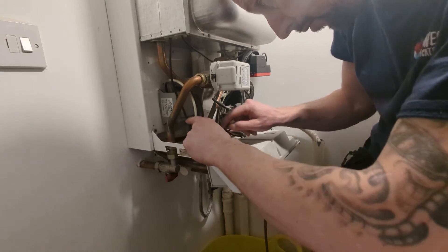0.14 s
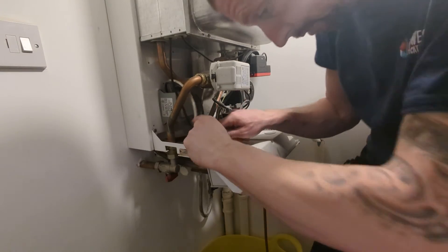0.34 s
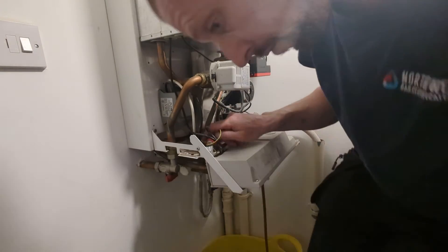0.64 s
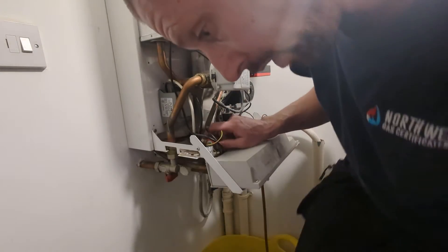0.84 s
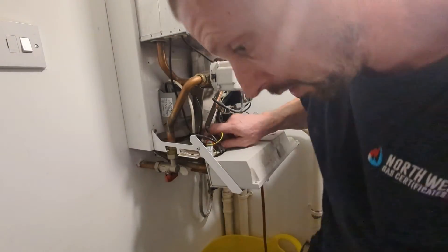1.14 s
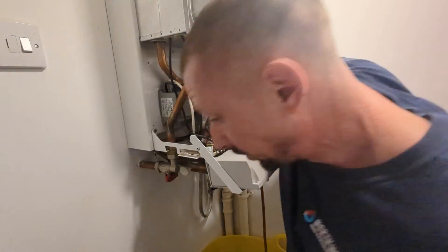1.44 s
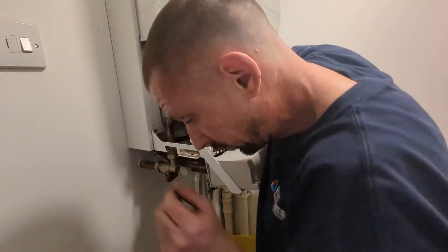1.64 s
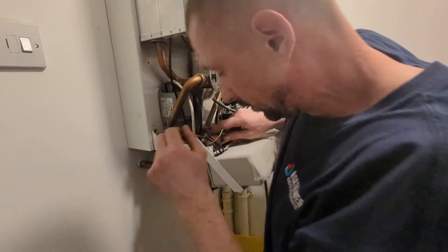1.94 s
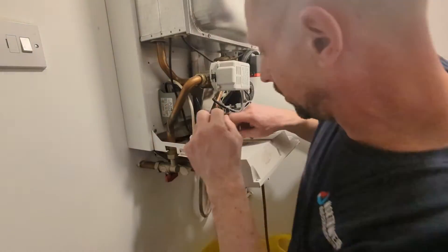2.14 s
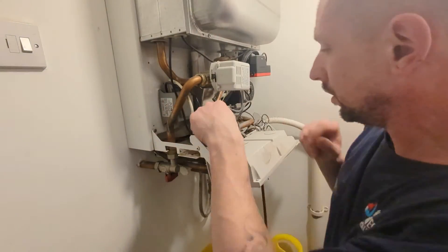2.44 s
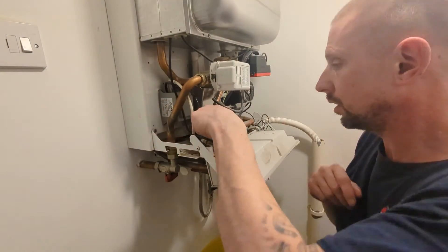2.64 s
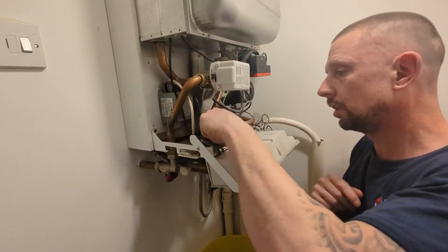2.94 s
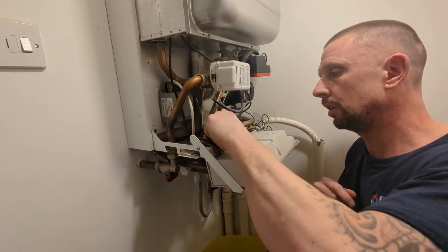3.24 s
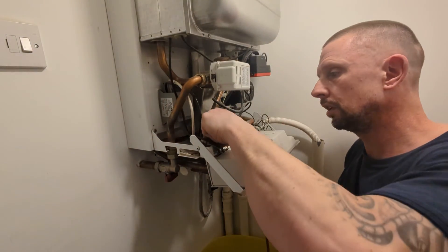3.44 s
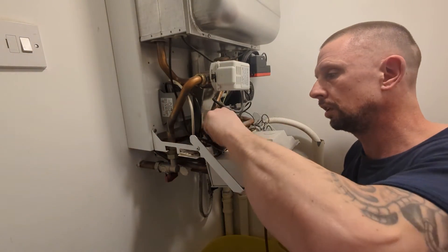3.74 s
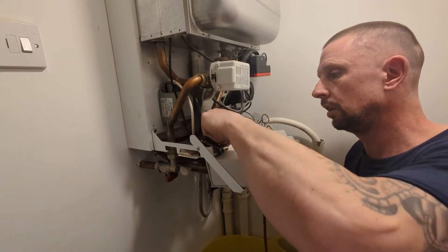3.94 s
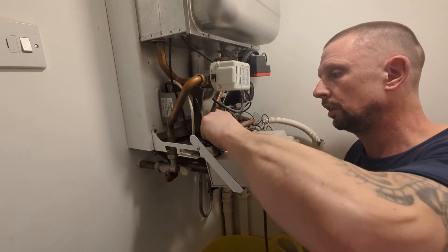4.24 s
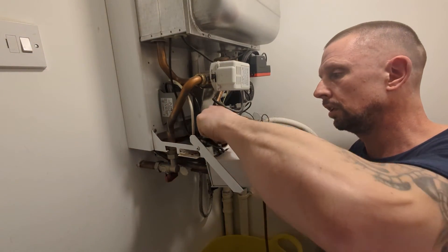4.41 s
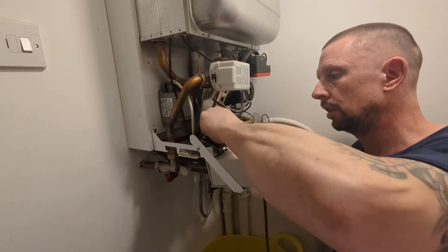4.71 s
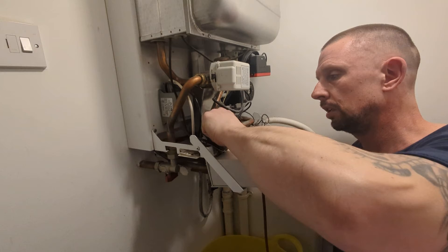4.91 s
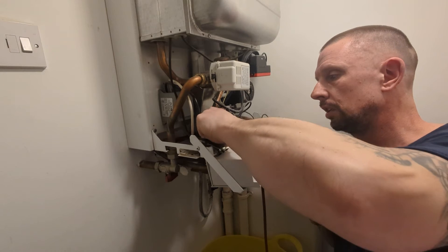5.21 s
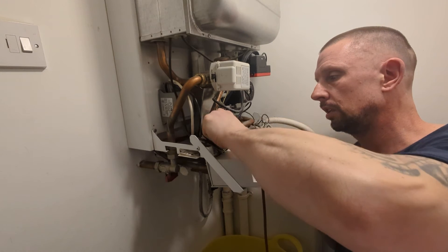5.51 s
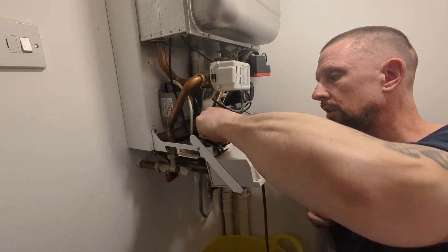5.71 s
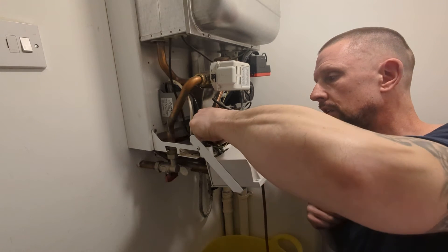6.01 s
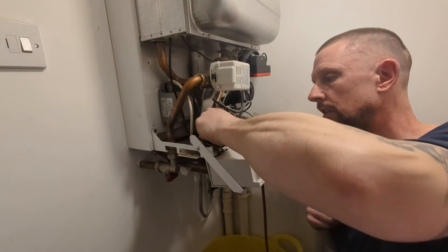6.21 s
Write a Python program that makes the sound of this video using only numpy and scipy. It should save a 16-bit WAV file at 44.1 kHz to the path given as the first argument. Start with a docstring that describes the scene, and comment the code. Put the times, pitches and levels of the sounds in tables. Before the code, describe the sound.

Fingers and a tool click and scrape on brass fittings in a metal casing, cloth rustles close by, hollow knocks and a clatter, then quiet fiddling.

```python
"""Hands work on a valve inside an open wall boiler: fingers and a tool click and scrape on brass fittings.
Each touch is shaped noise in six registers; casing, control box and small parts ring as decaying sines.
As the worker leans in, a shirt rustles and zips over an edge, made of rippled noise and thin whistles.
The casing takes hollow knocks and a clatter, and late on a small metal part gives one bright ping.
Soft bumping, a low rumble and the still air of a small hard-walled room are steady colours of noise."""
import sys
import numpy as np
from scipy import signal
from scipy.fft import rfft, irfft, next_fast_len
from scipy.io import wavfile

SR = 44100
rng = np.random.default_rng(int(sys.argv[2]) if len(sys.argv) > 2 else 0)


def pcm_store(signal):
    """Save signal as 16-bit PCM."""
    levels = np.round(np.clip(np.atleast_2d(signal), -1, 1) * 32767)
    wavfile.write(sys.argv[1], SR, levels.astype(np.int16).T)


N = 280476   # length in samples
TIME = np.arange(N) / SR   # seconds
LOW_CUT_HZ, TOP_CUT_HZ = 28.6, 15850

# the six registers of a touch, thud to tick; rise and ring times are later scaled by the manner of the touch:
# [low_hz, high_hz, rise_s, ring_s (fall by 60 dB), relative_db, weight_share, hardness_share, clank_share]
TOUCH_REGISTERS = [(151, 390, 0.0035, 0.34, -0.5, 1, 0.066, 0.083),
                   (413, 740, 0.0097, 0.21, -1, 0.59, 0.012, 0.054),
                   (850, 1460, 0.0021, .19, -2, 0.094, 0.036, 0.89),
                   (1440, 3000, 0.0035, 0.14, -5, 0, 0.013, 0.017),
                   (2726, 6050, 0.0016, 0.15, -3, 0.028, 0.61, 0),
                   (7100, 16000, 0.004, 0.11, -1.5, 0.23, 1, 0.06)]
# how fast the shirt slides as the worker leans in and back: [time_s, speed_db (0 is a steady slide)]
SHIRT_SPEED = [(0.0, -27), (0.4, -8), (0.55, -12), (0.74, -13), (0.8, -6), (0.92, -4.5), (1.22, -2),
               (1.5, 1.5), (1.72, 0), (2.0, -0.5), (2.16, 0.5), (2.44, -2), (2.77, 6), (2.86, 0.5),
               (2.95, -16), (3.12, -19), (3.5, -28)]


def from_db(db):
    """Decibels to gain."""
    return 10 ** (np.asarray(db) / 20)


def rms_one(x):
    """Scale to unit rms."""
    return x / np.sqrt(np.mean(x ** 2) + 1e-20)


def in_time(rows):
    """Each column of a curve, joined by straight lines, at every sample."""
    s, *columns = np.transpose(rows)
    return [np.interp(TIME, s, column) for column in columns]


def at_hz(points, hz):
    """Read a table of (Hz, value) on a log-frequency axis."""
    table_hz, values = np.array(points).T
    return np.interp(np.log(hz + 1), np.log(table_hz), values)


def drift(per_s):
    """Random wandering: values of spread 1, so many a second, joined by straight lines."""
    knots = rng.standard_normal(4096)
    return np.interp(TIME * per_s, np.arange(len(knots)), knots)


def ripple(depth_db, density):
    """Random peaks and gaps across frequency, as a function of Hz: the many modes of one spot."""
    knots = rng.standard_normal(1024)

    def gain_at(hz):
        place = density * np.log1p(hz / 400)
        return from_db(depth_db * np.interp(place, np.arange(len(knots)), knots))
    return gain_at


def diffuse(gain_at, size):
    """Stereo noise of a given colour and rms 1; the two sides are alike mainly in the bass."""
    # left-right likeness of the noise: [pitch_hz, correlation (1 is identical)]
    likeness = [(60, .99), (150, 0.95), (280, 0.79), (560, 0.57), (1100, 0.12), (2200, -0.028),
                (4500, 0.075), (15000, -0.052)]
    hz = np.fft.rfftfreq(size, 1 / SR)
    alike = np.clip(at_hz(likeness, hz), -1, 1)
    mid, side = rfft(rng.standard_normal((2, size)))
    both_sides = np.sqrt(1 + alike) * mid + np.sqrt(1 - alike) * side * [[1], [-1]]
    return rms_one(irfft(gain_at(hz) * both_sides, size))


def noise(spectrum, ripple_db=0):
    """Lasting diffuse noise with a tabled spectrum, rippled by nearby reflections."""
    peaks = ripple(ripple_db, density=35)

    def gain_at(hz):
        return from_db(at_hz(spectrum, hz)) * peaks(hz) * (hz > 15)
    return diffuse(gain_at, next_fast_len(N, True))[:, :N]


def panned(x, pan_db):
    """Lean a sound to the left by so many dB."""
    return x * from_db([[pan_db / 2], [-pan_db / 2]])


def add(track, s, sound):
    """Mix a sound in at a time in seconds."""
    at = int(round(s * SR))
    track[..., at:at + sound.shape[-1]] += sound[..., :N - at]


def high_passed(x, hz, order):
    """Butterworth high-pass."""
    return signal.sosfilt(signal.butter(order, hz, "high", fs=SR, output="sos"), x)


def low_passed(x, hz, order):
    """Butterworth low-pass."""
    return signal.sosfilt(signal.butter(order, hz, fs=SR, output="sos"), x)


def clicks(rows):
    """One impulse for each (s, dB)."""
    out = np.zeros(N)
    for s, db in rows:
        add(out, s, from_db([db]))
    return out


def blows(rows):
    """Force of a series of blows; a soft contact spreads it in time and leaves mostly the low modes."""
    force = np.zeros(N)
    for s, db, cut_hz in rows:
        push = low_passed(signal.unit_impulse(1024), cut_hz, order=2)
        add(force, s, from_db(db) * push)
    return force


def ring(force, modes):
    """Decaying sines set off by a force: each mode is a two-pole resonator."""
    out = 0
    for hz, db, t60 in modes:
        radius = from_db(-60 / (t60 * SR))
        angle = 2 * np.pi * hz / SR
        poles = [1, -2 * radius * np.cos(angle), radius * radius]
        out = out + from_db(db) * signal.lfilter([0, np.sin(angle)], poles, force + 1e-18)
    return out


def room(x, wet_db, t60):
    """Direct sound plus the dense reflections of close walls, which start after 2 ms."""
    t = TIME[:16384]
    tail = diffuse(np.ones_like, size=len(t)) * from_db(-60 * t / t60) * (t > .002)
    tail = rms_one(tail) / np.sqrt(len(t))
    return x + from_db(wet_db) * signal.fftconvolve(np.atleast_2d(x), tail, axes=1)[:, :N]


def air():
    """The still air of the room: steady, faint noise."""
    # its colour: [pitch_hz, relative_db per Hz]
    air_colour = [(88, -25.5), (150, -1.5), (361, -26), (566, -13.5), (662, -17), (888, -17), (1420, -23.5),
                  (1690, -20), (4240, -32.5), (6510, -33), (7320, -41), (11700, -40.5), (16000, -72.5)]
    return from_db(-66) * noise(air_colour)


def shifting(rumble_db, rumble_follows, bump_db, uneven_db):
    """Shifting weight bumps softly on the casing and stirs the room's lowest modes, more so at each heave."""
    # how much the body moves against floor and casing, as the level of its soft bumping: [time_s, effort_db]
    effort_curve = [(0.0, -62.5), (0.39, -54), (0.85, -61), (1.03, -48), (1.47, -45.5), (2.48, -54),
                    (2.78, -52.5), (2.96, -54), (3.4, -59.5), (3.52, -62), (3.77, -76), (3.91, -62.5),
                    (4.41, -60), (4.76, -68), (4.99, -65), (5.23, -60), (6.15, -69.5), (6.36, -65)]
    # heavier shifts of weight, each a short swell of rumble: [peak_s, level_db]
    heave_times = [(.5, -44), (1.151, -36.5), (1.93, -47), (2.12, -32.5), (2.91, -40.5), (3.82, -47),
                   (4.46, -51)]
    # colour of the rumble: [pitch_hz, relative_db per Hz]
    rumble_colour = [(20, -34), (30, -9), (40, -15), (50, 8.5), (59, 6.5), (70, 6.5), (85, -16),
                     (105, -14.5), (130, -5.5), (180, -49.5)]
    # colour of the bumping: [pitch_hz, relative_db per Hz]
    bumping_colour = [(59, -40.5), (100, 1.5), (161, 5), (189, 3), (284, -19), (324, -14), (413, -14),
                      (480, -5), (620, -34), (1060, -120)]
    heave_half_length_s = 0.045

    effort_db, = in_time(effort_curve)
    heaves = sum(from_db(db) * np.exp(-((TIME - s) / heave_half_length_s) ** 2) for s, db in heave_times)
    rumble = from_db(rumble_db + rumble_follows * (effort_db - effort_db.mean())) + heaves
    bumping = from_db(effort_db + bump_db + uneven_db * drift(13))
    return panned(rumble * noise(rumble_colour) + bumping * noise(bumping_colour), pan_db=-1.0)


def zips():
    """The sleeve's threads cross an edge almost evenly: a narrow, unsteady whistle that sinks as it slows."""
    # zips of the weave: [start_s, length_s, relative_db, starting_pitch_hz]
    zip_rows = [(0.595, 0.084, -69, 8800), (0.758, 0.082, -56, 9540), (0.82, 0.08, -60, 9380)]
    sag_hz_per_s, unevenness_per_s = 5650, 280
    out = np.zeros((2, N))
    for s, length, db, hz in zip_rows:
        t = TIME[:int(length * SR)]
        phase = 2 * np.pi * (hz * t - sag_hz_per_s * t ** 2 / 2)
        uneven = np.array([drift(unevenness_per_s)[:len(t)] for side in range(2)])
        swell = np.sin(np.pi * t / length)
        add(out, s, from_db(db) * swell * uneven * np.sin(phase))
    return out


def passing_noise(spectrum, ripple_db, count=15):
    """Noise from a moving source: its ripple of reflections changes from one position to the next."""
    end_s = SHIRT_SPEED[-1][0]
    position = np.interp(TIME, [0, end_s], [0, count - 1])
    out = 0
    for k in range(count):
        nearness = np.clip(1 - abs(position - k), 0, 1)
        out = out + np.sqrt(nearness) * noise(spectrum, ripple_db)
    return out


def flickering(x, depth_db, per_s, count=7):
    """Fibres of different sizes catch by turns, so each region of the spectrum flickers by itself."""
    hz = np.fft.rfftfreq(N, 1 / SR)
    place = np.interp(np.sqrt(hz), np.sqrt([1000, TOP_CUT_HZ]), [0, count - 1])
    spectrum = rfft(x)
    out = 0
    for k in range(count):
        region = irfft(spectrum * np.clip(1 - abs(place - k), 0, 1), N)
        out = out + region * from_db(depth_db * drift(per_s))
    return out


def shirt(rub_db, hiss_db, hiss_growth, grain_db, grain_per_s, sway_db, catch_db):
    """Cloth slides close by: hiss grows faster with speed than rub; fibres roughen both, folds catch in the rub."""
    # quicker brushes of the sleeve: [peak_s, extra_hiss_db, extra_rub_db, half_length_s]
    brushes = [(0.354, 9, 4.5, 0.039), (0.97, 13.5, 3.5, 0.056), (1.954, 5.5, 5, 0.065),
               (2.22, 4, -3.5, 0.057), (2.284, 7, -2, 0.033), (2.61, 4.5, -2, 0.084),
               (2.748, 2, 7.5, 0.036), (2.918, 2.5, 6.5, 0.02)]
    # colour of the low rub: [pitch_hz, relative_db per Hz]
    rub_colour = [(150, -12.5), (250, -0.5), (364, -6.5), (579, -4.5), (792, -5.5), (1010, -6),
                  (1560, -12.5), (1880, -12), (5000, -24), (6500, -56), (11000, -120)]
    # colour of the high hiss: [pitch_hz, relative_db per Hz]
    hiss_colour = [(1470, -21), (2500, -7.5), (3920, -6), (5030, -7), (6450, -4), (9960, -5), (11800, -4),
                   (13200, -7), (15200, -13.5), (16000, -15.5)]

    speed_db, = in_time(SHIRT_SPEED)
    rub_level = rub_db + speed_db + catch_db * drift(63)
    hiss_level = hiss_db + hiss_growth * speed_db
    for s, more_hiss_db, more_rub_db, half_length in brushes:
        swell = np.exp(-((TIME - s) / half_length) ** 2)
        rub_level = rub_level + more_rub_db * swell
        hiss_level = hiss_level + more_hiss_db * swell
    rub = from_db(rub_level) * passing_noise(rub_colour, ripple_db=4.5)
    hiss = from_db(hiss_level) * passing_noise(hiss_colour, ripple_db=4.0)
    cloth = flickering(rub + hiss, depth_db=2.2, per_s=110)
    moving = np.interp(TIME, [3.3, 3.7], [1, 0])   # the cloth falls silent
    roughness = from_db(grain_db * drift(grain_per_s) + sway_db * drift(25.13))
    return panned(cloth * moving * roughness, pan_db=-1.0)


def small_parts():
    """Dry snaps, a bouncing tool and a springing metal part ring briefly; all are too small to give any bass."""
    # tiny dry snaps: [start_s, relative_db]
    snap_times = [(.6555, -62), (1.868, -41), (3.4625, -56.5), (3.9475, -51.5)]
    # their modes: [pitch_hz, relative_db, ring_s (fall by 60 dB)]
    snap_modes = [(3300, 7, 0.013), (3930, 6.5, .006), (4580, 6, 0.0038), (6340, 6.5, 0.0069)]
    # the steel tool strikes a fitting and bounces: [start_s, relative_db]
    clink_times = [(2.6515, -35), (2.6595, -39.5)]
    # modes of the tool: [pitch_hz, relative_db, ring_s (fall by 60 dB)]
    tool_modes = [(1035, -3.5, 0.07), (1155, 1.5, 0.12), (1224, -1.5, 0.12), (1510, -11, .15),
                  (2640, -9, .11), (2842, -10.5, .16), (3880, -10, .18), (3980, -10, .2), (3950, -13, 0.32),
                  (5360, -15, 0.16), (5260, -15.5, .17), (6430, -22, 0.14)]
    # a small metal part springs free; three touches in quick succession: [start_s, relative_db]
    ping_times = [(5.6745, -47), (5.6778, -37.5), (5.6825, -46)]
    # modes of that part: [pitch_hz, relative_db, ring_s (fall by 60 dB)]
    ping_modes = [(5450, -23, 0.066), (5360, -16, .07), (6000, -12, 0.063), (6200, -22, 0.054),
                  (6470, -11, 0.06), (10440, -9, 0.068), (10900, -14, .06), (11140, -6, 0.07),
                  (11440, 1, 0.085), (11500, -1, .07), (11680, -8, .05), (12030, -12, .05),
                  (12462, -12, 0.064), (12736, -5, 0.055), (13000, -14, .05), (13300, -10, .05)]

    snaps = room(ring(clicks(snap_times), snap_modes), wet_db=-11, t60=0.15)
    snaps = low_passed(high_passed(snaps, hz=2870, order=8), hz=7700, order=8)
    clink = room(ring(clicks(clink_times), tool_modes), wet_db=3, t60=0.11)
    clink = high_passed(clink, hz=850, order=4)
    ping = room(ring(clicks(ping_times), ping_modes), wet_db=2.5, t60=0.1)
    ping = low_passed(high_passed(ping, hz=4530, order=2), hz=13400, order=10)
    return snaps + clink + panned(ping, pan_db=-3.0)


def booms():
    """A low note swells and dies after each heavy bump."""
    # the note depends on where the weight lands: [start_s, relative_db, pitch_hz]
    boom_rows = [(1.127, -25.5, 67.4), (1.37, -26, 65), (2.089, -24, 60.2), (2.821, -26, 75.1)]
    swell_s, t60_s = 0.03, 0.5
    out, t = np.zeros(N), TIME[:SR]
    envelope = (1 - np.exp(-t / swell_s)) * from_db(-60 * t / t60_s)
    for s, db, hz in boom_rows:
        add(out, s, from_db(db) * envelope * np.sin(2 * np.pi * hz * t))
    return out


def radiated(force, modes, lag_s):
    """Near the wall each mode reaches the two sides at unequal levels, the left one a little late."""
    left, right = sum(panned(ring(force, [mode]), pan_db) for *mode, pan_db in modes)
    return np.array([np.interp(TIME - lag_s, TIME, left), right])


def knocks():
    """Casing and plastic control box ring hollowly when struck, with deep booms beneath."""
    # blows on the steel casing: [start_s, relative_db, softness_hz (cut-off; lower is softer)]
    casing_blows = [(1.353, -15.5, 805), (1.3569, -6, 415), (1.3687, -12, 267), (1.3779, -34, 1515),
                    (2.0515, -30.5, 1500)]
    # modes of the casing panel: [pitch_hz, relative_db, ring_s (fall by 60 dB), left_over_right_db]
    casing_modes = [(164.3, -17, 0.54, 1.5), (177, -23, 0.49, -2), (230, -10, .18, -2.5),
                    (250, -10.5, 0.26, -9), (336.5, 0.7, .21, -2.5), (398.5, -5, 0.15, 1),
                    (473, -10.6, 0.09, 5.5), (594, -6, 0.27, -3.5), (603, -1.7, .2, 0), (696, -14, 0.24, 4),
                    (816, -15, .19, 5), (897, -8, .17, 4), (988, -12.5, .19, -3.5), (1115, -4.5, 0.22, 0),
                    (1188, -17.5, .22, 0)]
    # bumps on the fold-down control box: [start_s, relative_db, softness_hz (cut-off; lower is softer)]
    box_bumps = [(.226, -45.5, 219), (.412, -44, 219), (.7795, -46, 1000), (2.0595, -33.5, 1110),
                 (2.7012, -28.5, 700), (2.706, -17.5, 166), (2.7105, -15.5, 190), (2.7402, -34, 980),
                 (2.7652, -36, 1150), (2.7784, -25.5, 940), (2.7896, -25.5, 694), (2.8119, -23.5, 540),
                 (3.415, -51, 316), (3.989, -49, 260), (4.197, -53.5, 302), (4.735, -53.5, 330),
                 (5.684, -51, 380), (5.709, -48, 398), (6.216, -50, 247), (6.27, -53.5, 253),
                 (6.325, -58, 250)]
    # modes of the control box: [pitch_hz, relative_db, ring_s (fall by 60 dB), left_over_right_db]
    box_modes = [(191.4, -2, 0.26, -3), (226.8, 2.5, 0.094, -2.5), (277, -14, 0.41, -0.5),
                 (322, -5.5, 0.27, -3), (387.5, -4.8, 0.11, -10), (427, -4.5, 0.061, 12),
                 (551, -4.5, 0.21, 8), (623, -4, 0.13, -1), (729, 1.5, 0.078, 2), (830, -5, 0.088, -4),
                 (914, -1, .14, -3), (996, -3.5, 0.24, 6)]

    casing = room(radiated(blows(casing_blows), casing_modes, lag_s=0.0003), wet_db=-10.0, t60=0.12)
    box = room(radiated(blows(box_bumps), box_modes, lag_s=0.00033), wet_db=-5.5, t60=0.12)
    # the panels give little deep bass; the casing's cut also softens its two lowest modes
    return high_passed(casing, hz=185.6, order=3) + high_passed(box, hz=106, order=2) + booms()


def cavity(hz, low, high, slope_db):
    """Gain of one register: steep edges, a slope per octave and the resonances of pipework and cavity."""
    # resonances that colour every touch: [pitch_hz, width_hz, peak_db]
    resonances = [(347, 100, -3), (572, 75, 10), (735, 20, 8), (878, 90, 14), (985, 24, 11.5),
                  (1127, 55, 8), (1220, 43, 5), (1475, 21, 1.5), (1703, 220, 7), (1900, 110, 6.5),
                  (2227, 58, 1.5), (2410, 140, 6), (2690, 120, 3), (3630, 150, 8.5), (3940, 130, 5.5),
                  (5110, 910, 5), (6530, 590, 7.5), (10530, 4200, 6)]
    hz = hz + 1   # keeps the logarithm finite
    peaks_db = sum(db / (1 + (2 * (hz - centre) / width) ** 2) for centre, width, db in resonances)
    edges = np.sqrt((1 + (low / hz) ** 10) * (1 + (hz / high) ** 10))
    return from_db(peaks_db + slope_db * np.log2(hz / low)) / edges


def register_levels(strength_db, weight_db, hardness_db, clank_db):
    """Level of each register for one touch: weight, hardness and clank each lift their share."""
    return [strength_db + db + heavy * weight_db + hard * hardness_db + clank * clank_db
            for *_, db, heavy, hard, clank in TOUCH_REGISTERS]


def touch(levels, envelopes, colours):
    """One spot on the fittings sounds in all registers, each a noise with its level and envelope."""
    spot = ripple(depth_db=4.0, density=32)(np.fft.rfftfreq(len(envelopes[0]), 1 / SR))
    sound = 0
    for db, envelope, colour in zip(levels, envelopes, colours):
        grain = diffuse(lambda hz: colour * spot, len(envelope))
        sound = sound + from_db(db) * envelope / envelope.max() * grain
    return sound


def contacts(level_db, slope_db, grit_db, grit_per_s):
    """Noise stands for the thicket of modes a touch excites: it builds up and dies; a scrape keeps feeding it."""
    # touches on fittings and casing; weight brings out the bass, a hard contact the treble,
    # and sheet metal clanks more than a solid fitting:
    # [start_s, strength_db, weight_db, hardness_db, clank_db], all levels relative
    touches = [(0.052, -50, -1, -14, 8.5), (0.141, -52.5, -23, 4.5, 4), (0.338, -60.5, 0, 5.5, 4),
               (0.471, -48.5, 0, -3, 4), (0.590, -41, -9, -15.5, -0.5), (0.652, -69.5, -4, 15, 15),
               (0.779, -47.5, 3.5, -23, -1), (0.928, -46.5, 4, -4, 4), (0.985, -41.5, -25, -22, -1),
               (1.04, -71.5, 31.5, 10.5, 2), (1.118, -45.5, 1.5, -3, 1), (1.179, -54, -31, 6, -9),
               (1.288, -43.5, -40, -0.5, -8), (1.3497, -34.5, 7, 4, 0), (1.491, -39.5, -5, -18, 2.5),
               (1.508, -44, 2.5, 3, -1), (1.846, -33.5, -8.5, -14, 0.5), (2.0511, -27, -3.5, -16.5, 4),
               (2.37, -49.5, 10, -51, 8), (2.621, -58, 19.5, 1, 2), (2.6506, -28, -32, 4, -0.5),
               (2.6973, -35.5, -1, -10, -1), (3.006, -55, -2.5, -21, 3), (3.177, -53.5, 6, -8.5, 1),
               (3.276, -61.5, -8, -13, 4), (3.327, -61, 1.5, -11, 1), (3.704, -55, -25, 11.5, -3.5),
               (3.726, -53.5, -0.5, -16.5, -2), (3.768, -51, -8, -19, 1), (3.829, -60.5, -0.5, -20, -8),
               (3.87, -62, -30, 7, -5), (3.99, -64.5, 1, -16, 2), (4.061, -58.5, -18, -13, -0.5),
               (4.176, -54.5, -2, -18, -6), (4.402, -42, -12.5, -11, -6.5), (4.561, -60.5, -26, -4.5, -12),
               (5.037, -43.5, -16, -36, -8), (5.064, -47.5, -8, -8.5, -9), (5.152, -40.5, -11, -18.5, -7),
               (5.19, -55.5, 5.5, -29, -10), (5.268, -48.5, -18, -25, -9), (5.461, -53.5, -12.5, -28, -0.5),
               (5.684, -56.5, -4, -4.5, 2), (5.814, -53, -13, -19.5, 1), (6.056, -58, 0, -27, -0.5),
               (6.187, -57, -18.5, -17.5, -12.5)]
    # a tool or fingernail drags over the fittings, catching as it goes:
    # [start_s, length_s, strength_db, weight_db, hardness_db, clank_db], all levels relative
    scrapes = [(1.363, 0.033, -31.5, 5, -15, 1.5), (2.746, 0.022, -36, 2.5, -10, 1),
               (2.773, 0.022, -41, 16, -15, 3), (2.972, 0.042, -58.5, -5, -13, 3),
               (3.75, 0.022, -58, -8, -19, 0), (3.918, 0.064, -69, 4, -14, 1.5),
               (4.154, 0.029, -59, 1, -22, 1.5), (4.272, 0.044, -69, 9, -26, -2),
               (4.333, 0.018, -57.5, -5, -19, -1), (4.355, 0.014, -50, -6, -30, -0.5),
               (5.554, 0.057, -69.5, 1.5, -39, 6.5), (5.633, 0.028, -49, -18, -5, -3.5),
               (5.725, 0.014, -54, -18, -11, -8), (5.841, 0.019, -57.5, -4, -34, -2),
               (6.024, 0.03, -69.5, -3, -15, -5)]
    scrape_rise_s, scrape_t60_s, catch_db, catches_per_s = 0.0046, 0.2, 1, 190

    out, t = np.zeros((2, N)), TIME[:12288]
    hz = np.fft.rfftfreq(len(t), 1 / SR)
    colours = [cavity(hz, low, high, slope_db) for low, high, *_ in TOUCH_REGISTERS]
    for s, strength_db, *manner in touches:
        levels = register_levels(strength_db, *manner)
        # light touches slide on slowly, hard ones strike
        gentle = np.interp(max(levels), [-50, -30], [1.8, .9])
        # the fingers damp the lightest ones
        ring_time = np.interp(strength_db, [-60, -48], [.65, .85])
        envelopes = [(1 - np.exp(-t / (rise * gentle))) * from_db(-60 * t / (t60 * ring_time))
                     for _, _, rise, t60, *_ in TOUCH_REGISTERS]
        add(out, s, touch(levels, envelopes, colours))
    for s, length, *force in scrapes:
        fade = from_db(-60 * np.maximum(t - length, 0) / scrape_t60_s)
        drag = (1 - np.exp(-t / scrape_rise_s)) * fade
        catching = from_db(catch_db * drift(catches_per_s)[:len(t)])
        add(out, s, catching * touch(register_levels(*force), [drag] * len(TOUCH_REGISTERS), colours))
    # the surfaces catch and slip while they touch
    return out * from_db(level_db + grit_db * drift(grit_per_s))


def scene():
    """Handwork, cloth and body movement over the still air of the room."""
    body = shifting(rumble_db=-50.0, rumble_follows=0.46, bump_db=-0.5, uneven_db=1.5)
    cloth = shirt(rub_db=-45, hiss_db=-51.0, hiss_growth=1.42, grain_db=0.04, grain_per_s=380,
                  sway_db=2.5, catch_db=-0.95)
    fittings = contacts(level_db=1.5, slope_db=-3, grit_db=1.5, grit_per_s=510)
    return air() + body + zips() + cloth + small_parts() + knocks() + fittings


def record(dry):
    """The microphone loses the deepest bass; the top is cut steeply."""
    thinned = high_passed(dry, hz=LOW_CUT_HZ, order=3)
    return signal.sosfilt(signal.ellip(10, .1, 80, TOP_CUT_HZ, fs=SR, output="sos"), thinned)


dry = scene()
out = record(dry)
pcm_store(out)
```